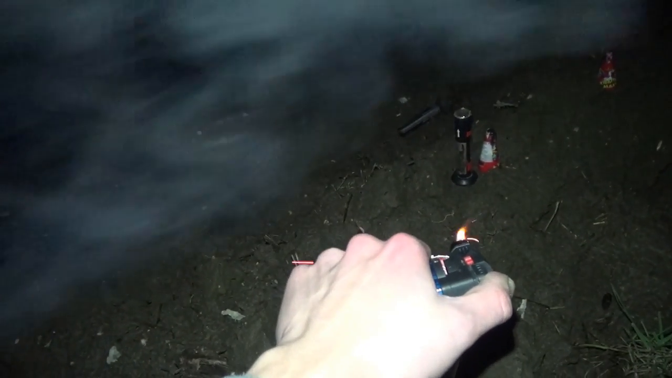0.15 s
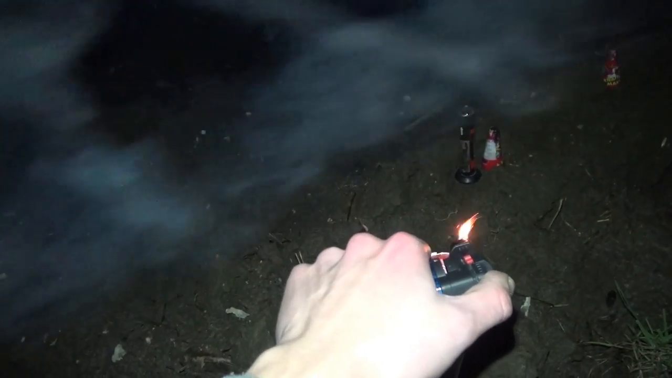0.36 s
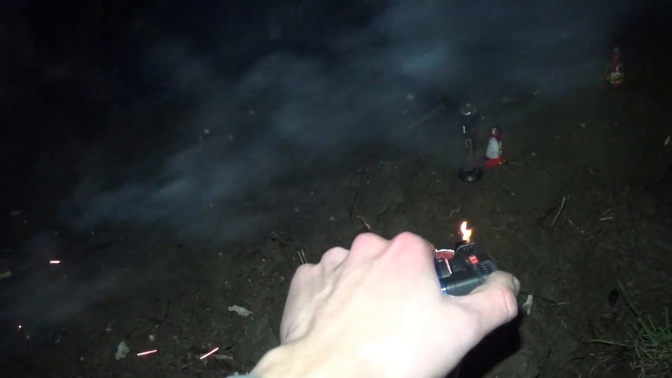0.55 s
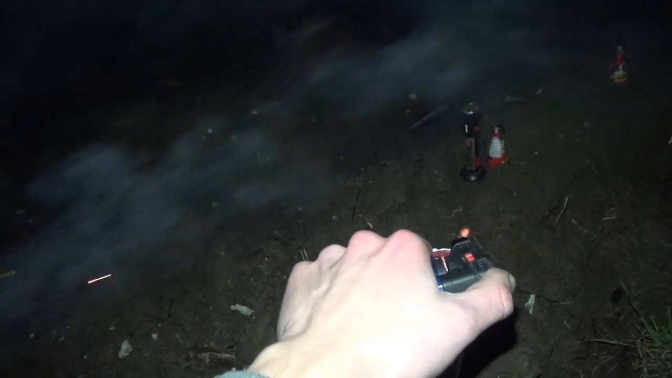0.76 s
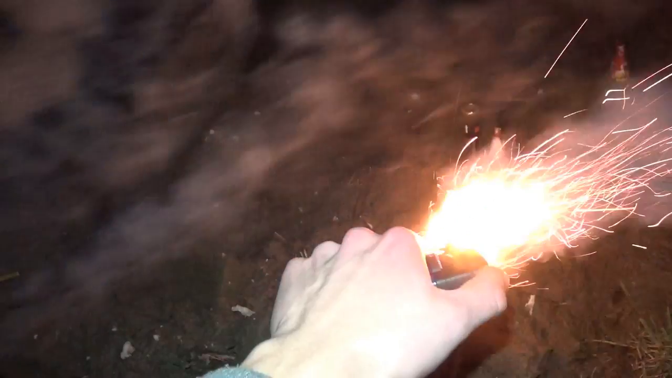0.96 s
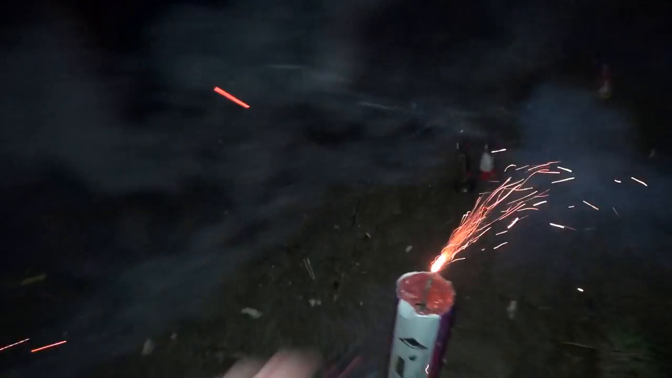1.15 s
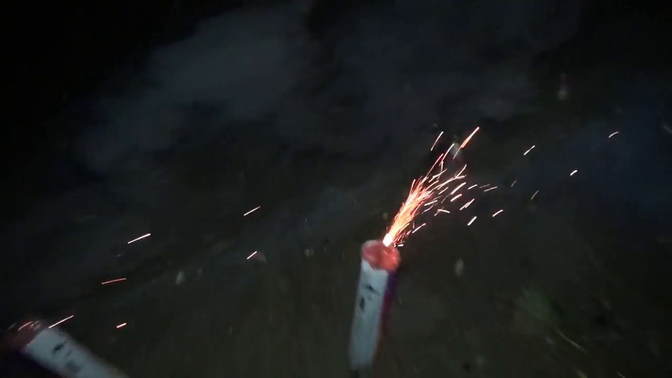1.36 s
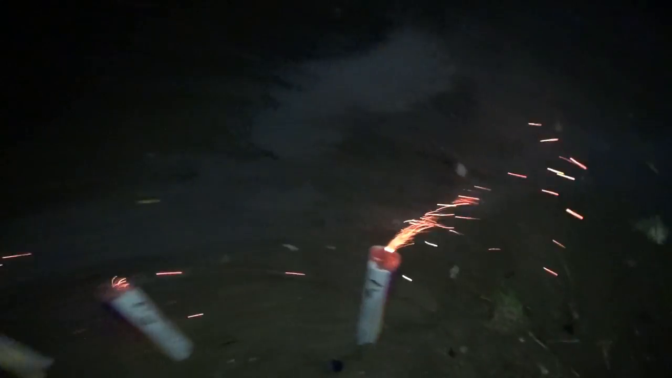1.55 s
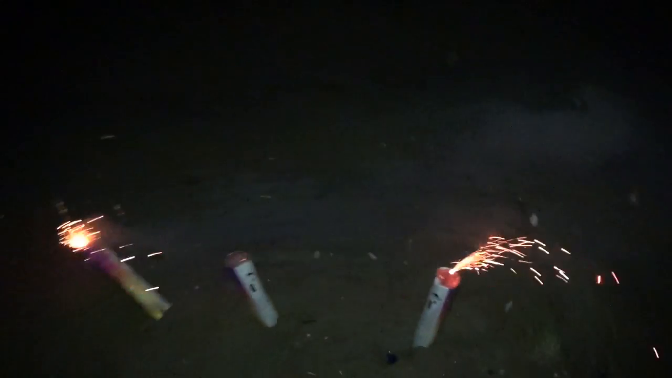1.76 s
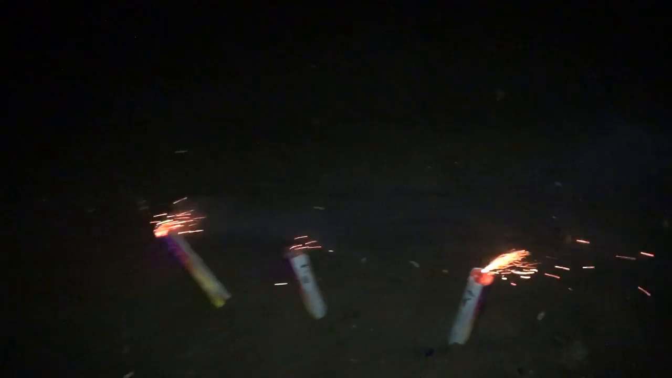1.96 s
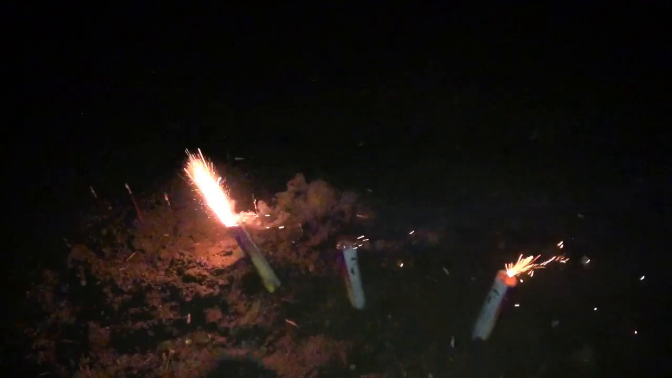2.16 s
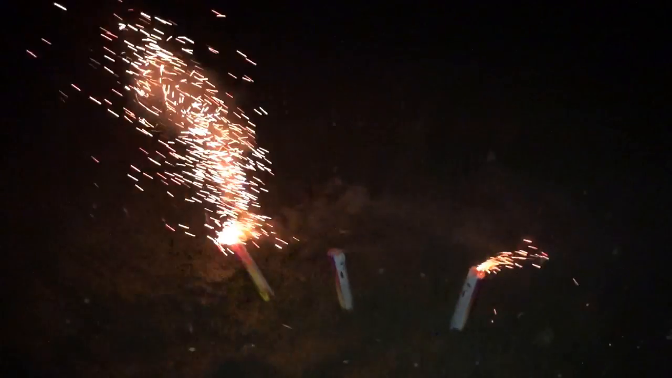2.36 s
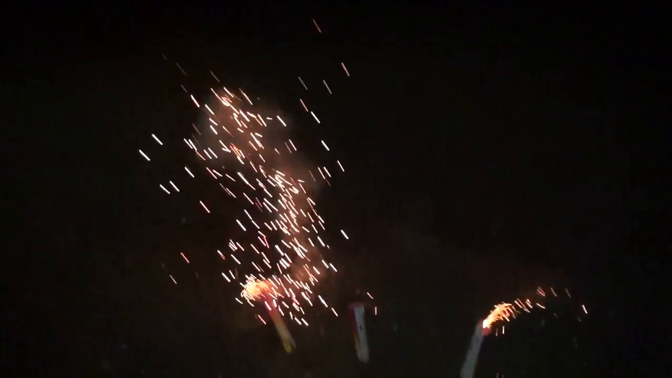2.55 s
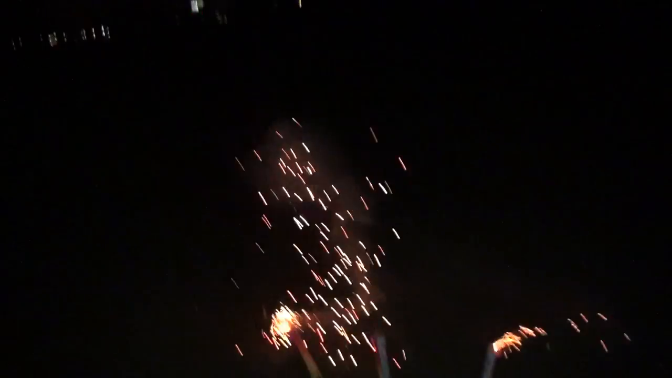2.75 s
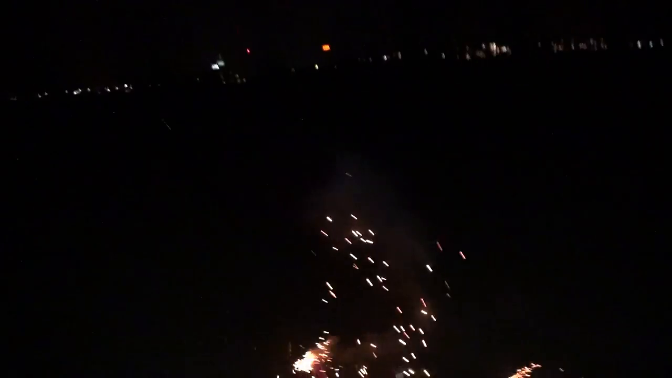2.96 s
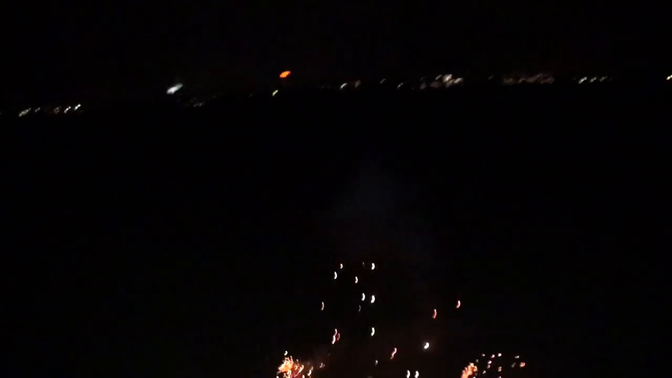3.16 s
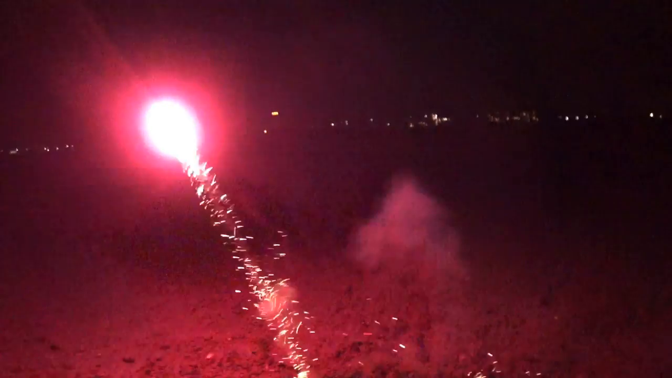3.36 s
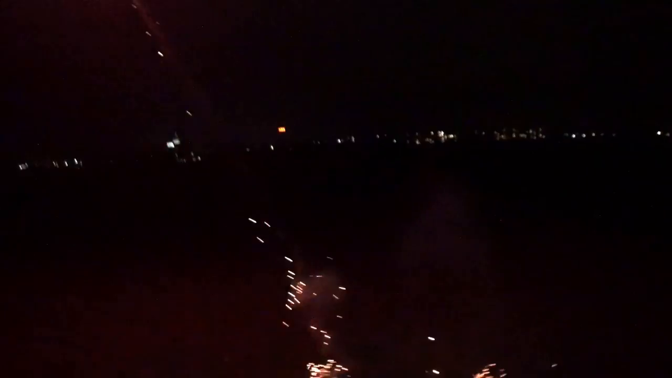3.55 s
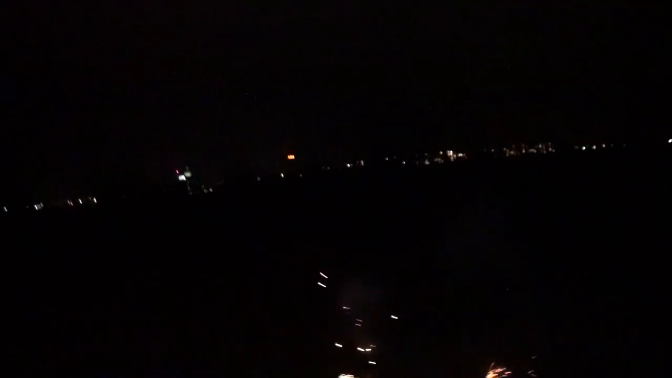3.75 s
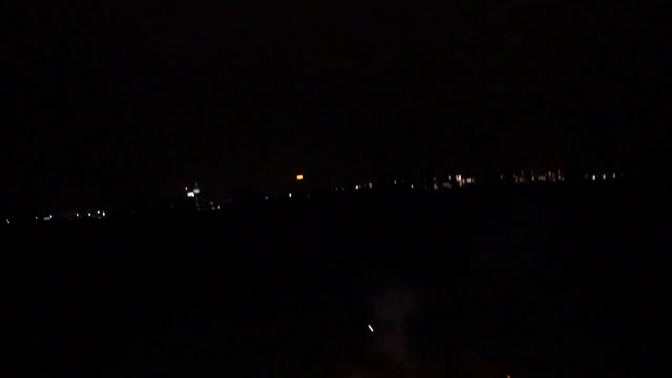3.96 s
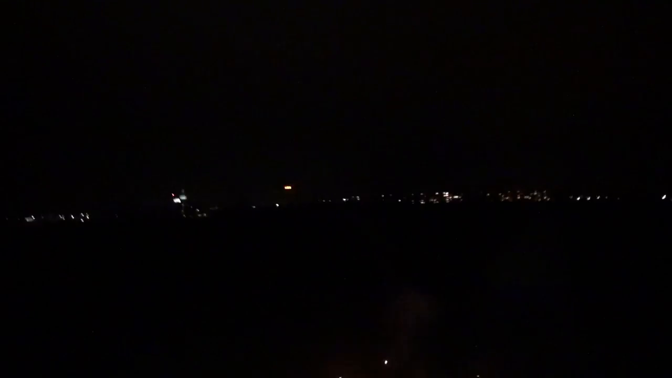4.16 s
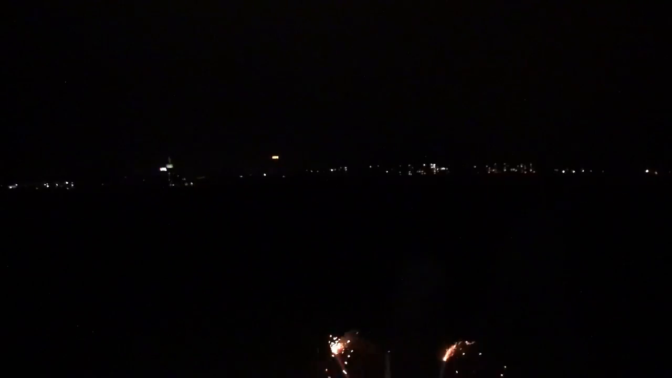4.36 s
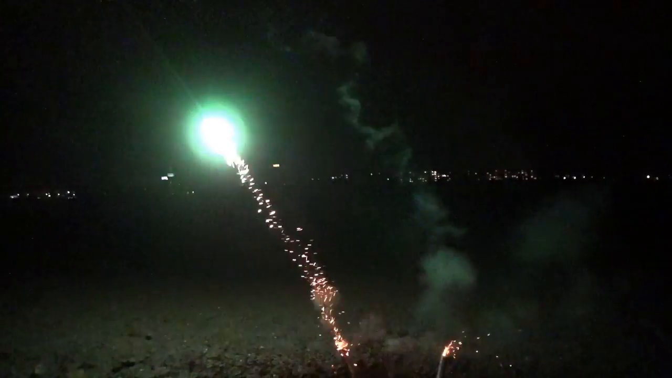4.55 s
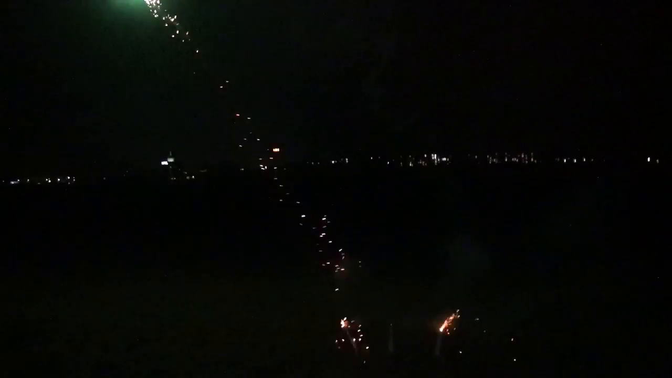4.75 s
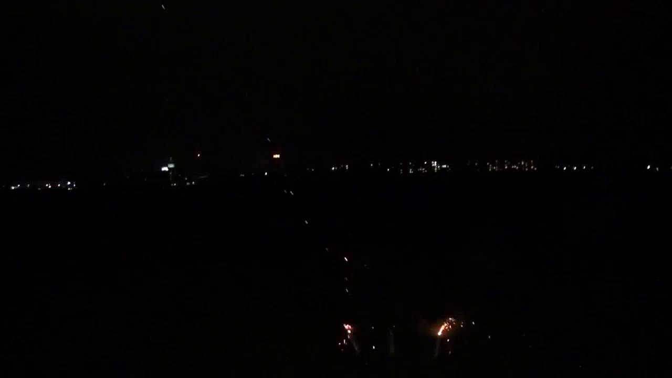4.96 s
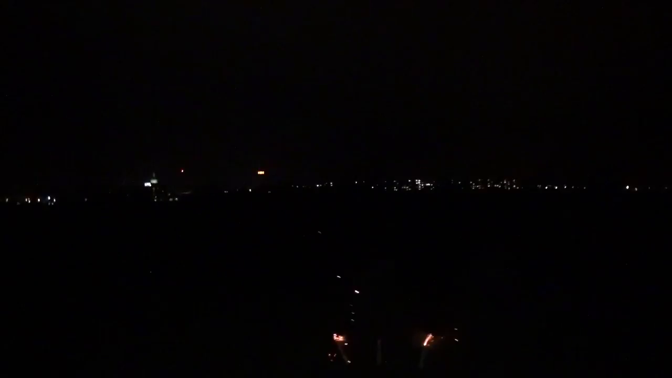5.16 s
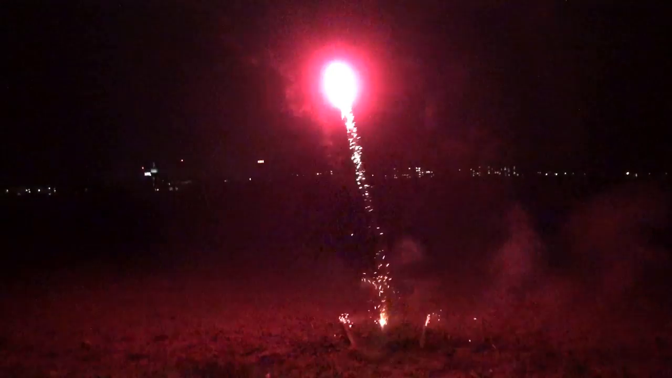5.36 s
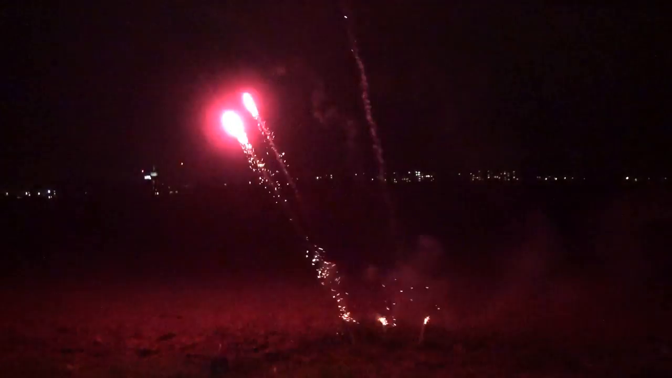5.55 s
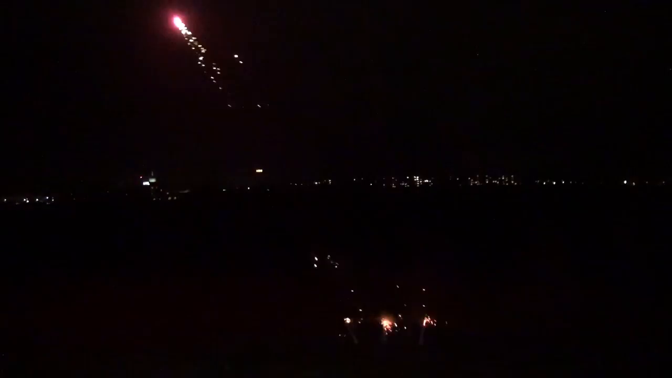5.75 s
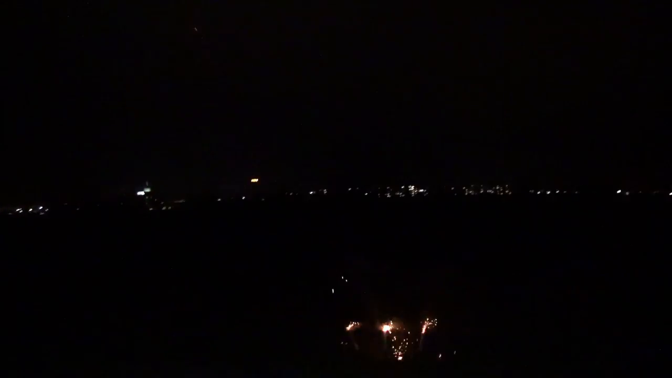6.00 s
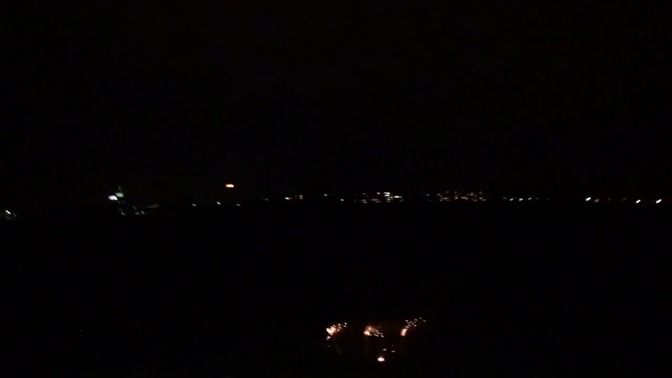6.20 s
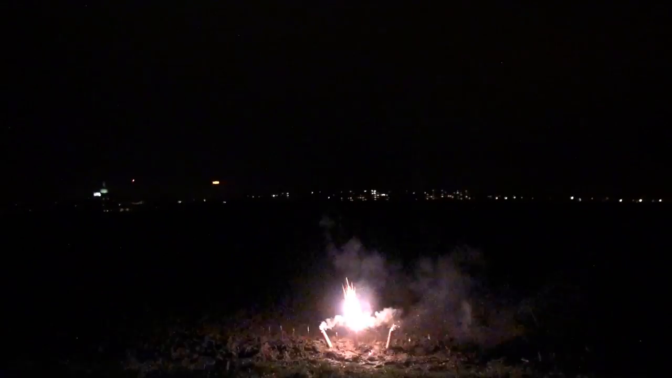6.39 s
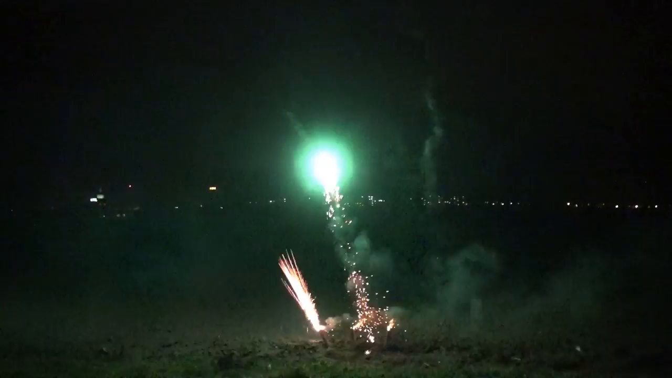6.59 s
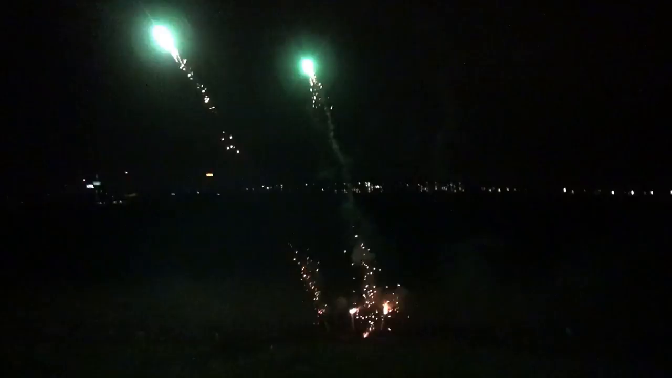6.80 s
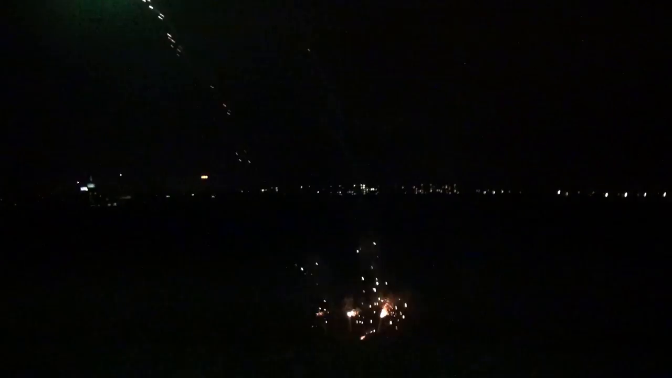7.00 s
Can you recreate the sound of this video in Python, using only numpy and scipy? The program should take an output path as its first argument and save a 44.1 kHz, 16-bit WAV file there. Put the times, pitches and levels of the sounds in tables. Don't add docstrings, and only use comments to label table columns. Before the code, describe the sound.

Close to a handheld stereo recorder, a fuse fizzes and spits, then a rough gush of burning gas flares for a moment. Steady sparkling hiss fades as the recorder backs away. Hollow tube pops follow, first spaced, later paired, with stars hissing off and dull snaps far up. Wind rumbles and the body gets knocked.

```python
import sys
import numpy as np
from scipy import signal
from scipy.fft import rfft, irfft
from scipy.io import wavfile
from scipy.ndimage import uniform_filter1d

SR = 44100
rng = np.random.default_rng(int(sys.argv[2]) if len(sys.argv) > 2 else 0)


def elevation(decibels):
    levels = np.asarray(decibels, float)
    return 10 ** (levels / 20)


def waveform_to_disk(signal):
    frames = np.transpose(np.atleast_2d(signal))
    scaled = np.clip(frames, -1, 1) * 32767
    samples = np.round(scaled).astype(np.int16)
    wavfile.write(sys.argv[1], SR, samples)


N = 310023


def evened(x):
    return x / np.sqrt(np.mean(x ** 2) + 1e-20)


def read(points, hz):
    f, value = np.transpose(points)
    return np.interp(np.log(hz + 1), np.log(f + 1), value)


def summed(levels_db):
    return 10 * np.log10((elevation(levels_db) ** 2).sum(axis=0))


def ragged_db(count, size, depth_db):
    return depth_db * evened(uniform_filter1d(rng.standard_normal(count), size=size))


def resonated(x, hz, q):
    return evened(signal.lfilter(*signal.iirpeak(hz, q, SR), x))


def add(mix, start_s, sound, pan_db):
    part = mix[:, round(start_s * SR):][:, :sound.shape[-1]]
    part += (sound * elevation([[pan_db / 2], [-pan_db / 2]]))[:, :part.shape[1]]


def colour(x, points):
    hz = abs(np.fft.fftfreq(2048, 1 / SR))
    log_gain = np.log(elevation(read(points, hz)))
    taps = np.fft.ifft(np.exp(np.conj(signal.hilbert(log_gain)))).real[:1024]
    return signal.fftconvolve(x, taps[None], axes=1)[:, :x.shape[1]]


# pitch_hz, likeness_0_to_1
PORT_LIKENESS = [(40, .995), (120, 0.96), (300, 0.93), (1400, 0.98), (3000, 1), (5000, 0.99), (8000, 0.84),
                 (10500, 0.78), (12000, .997)]
# pitch_hz, lead_rad
PORT_LEAD = [(0, 0), (5200, 0.0055), (8200, 0.27), (11000, 0.11), (16500, 0)]


def pair(count):
    a, b = rfft(rng.standard_normal((2, count)))
    hz = np.fft.rfftfreq(count, 1 / SR)
    same = np.clip(read(PORT_LIKENESS, hz), 0, 1)
    left = a * np.exp(1j * read(PORT_LEAD, hz))
    right = same * a + np.sqrt(1 - same ** 2) * b
    return irfft(np.array([left, right]), count)


def banded(noise, rows, bands, points, size, patchy_db, flicker_db):
    hz, t, z = signal.stft(noise, SR, nperseg=size, noverlap=size * 3 // 4)
    shape_db = read(points, hz)
    s, *columns = np.transpose(rows)
    columns = np.array([np.interp(t, s, c) for c in columns])
    levels, pans = columns[:len(bands)], columns[len(bands):]
    pans = pans[np.arange(len(bands)) * len(pans) // len(bands)]
    centre = [np.log(lo * hi) / 2 for lo, hi in bands]
    weight = np.array([np.interp(np.log(hz + 1), centre, one) for one in np.eye(len(bands))]).T
    inside = [(hz >= lo) & (hz < hi) for lo, hi in bands]
    own_db = [[10 * np.log10((elevation(shape_db[band]) ** 2).sum() / len(hz))] for band in inside]

    chance = rng.standard_normal((len(t), len(hz))).T
    patches = evened(uniform_filter1d(uniform_filter1d(chance, size=7, axis=0), size=8, axis=1))
    field_db = shape_db[:, None] + weight @ (levels - own_db)
    field_db = field_db + patchy_db * patches + ragged_db(len(t), 3, flicker_db)
    lean_db = weight @ pans / 2
    z = z * elevation(np.array([field_db + lean_db, field_db - lean_db]))
    return signal.istft(z, SR, nperseg=size, noverlap=size * 3 // 4)[1][:, :N]


# low_hz, high_hz
WIND_BANDS = [(25, 70), (80, 190), (210, 450), (500, 1100)]
# peak_s, length_s, level_db, strongest_hz
GUSTS = [(0.603, 3.1, -50, 90), (1.16, 0.4, -32.5, 520), (1.493, 0.43, -37, 75), (1.72, .25, -44, 300),
         (1.85, 0.21, -34, 480), (1.9, 0.37, -38, 58), (2.199, 0.13, -27, 138), (2.316, 0.15, -21.5, 73),
         (2.45, 0.15, -25.5, 120), (2.54, .25, -32, 60), (2.6, .22, -25, 150), (2.74, 0.24, -35, 170),
         (2.88, 0.45, -43, 150), (3.15, 0.59, -42, 238), (3.383, 0.21, -41, 740), (3.56, 0.44, -41, 105),
         (3.7, 0.27, -40, 58), (3.88, 0.36, -38.5, 125), (4.024, 0.18, -36.5, 387), (4.255, 0.13, -38, 450),
         (4.638, 0.4, -43.5, 120), (4.82, 0.16, -40, 195), (4.916, 0.31, -34, 230), (5.06, 0.21, -37, 422),
         (5.3, 0.41, -38.5, 430), (5.67, 0.42, -40.5, 194), (6.02, 0.37, -36.5, 397), (6.7, 0.27, -44, 420),
         (6.763, 0.28, -42.5, 65), (6.96, 0.39, -36, 190)]
# time_s, low_pan_db, high_pan_db
WIND_LEAN = [(0, 1, 2.5), (1.0, 3, 2.5), (1.3, 1.5, -4), (1.85, 2.5, 4), (2.2, -1, -3.5), (2.65, -0.5, -5),
             (3.9, 10.5, -5.5), (5.5, 13, -9), (6.3, 7, -7), (7.03, 5, -4)]


def gusting():
    ends_db, below_db_per_octave, above_db_per_octave = 11, 10.5, 10.5
    calm_db = (-80, -59, -52.5, -48.5)
    t = np.arange(0, N / SR + .01, .01)
    peak_s, length_s, level_db, hz = np.transpose(GUSTS)[:, :, None, None]
    octaves = np.log2(np.sqrt(np.prod(WIND_BANDS, axis=1))[:, None] / hz)
    slope_db = np.where(octaves < 0, -below_db_per_octave, above_db_per_octave) * octaves
    swell_db = ends_db * (2 * (t - peak_s) / length_s) ** 2
    gusts = summed(level_db - slope_db - swell_db + 0 * octaves)
    bands = summed([gusts, np.array(calm_db)[:, None] + 0 * t])
    lean_s, low, high = np.transpose(WIND_LEAN)
    return np.transpose([t, *bands, np.interp(t, lean_s, low), np.interp(t, lean_s, high)])


# pitch_hz, density_db_per_hz
WIND_COLOUR = [(12, -28), (30, -23.5), (70, -6), (110, 1), (170, 3), (300, -2.5), (420, -7), (780, -15),
               (1200, -17.5), (2500, -38.5)]


def wind():
    return banded(pair(N), gusting(), WIND_BANDS, WIND_COLOUR, size=1024, patchy_db=1.7, flicker_db=1.0)


# start_s, peak_db,
# pan_db, pitch_hz
KNOCKS = [(1.8056, -27, 2, 384), (1.8114, -26.5, 3, 404), (1.8455, -16, 1.5, 298), (2.3045, -14, -3, 153),
          (3.9923, -31, -6, 600), (4.0195, -31, -6, 560), (4.0498, -28, -7, 520), (4.268, -33, -6, 517),
          (5.3785, -13, -10, 600), (6.1204, -18, -8.5, 460), (6.736, -18.5, 2, 288),
          (6.738, -16.5, -8, 610), (6.6467, -17.5, -5.5, 510)]


def knock(mix, start_s, peak_db, pan_db, hz):
    turns = np.arange(round(SR * 5 / hz)) / SR * hz
    u = turns / 1.12
    push = u * np.exp(1 - u ** 1.9) * np.sin(2 * np.pi * turns ** 0.97)
    add(mix, start_s, elevation(peak_db) * push[None], pan_db)


# start_s, peak_db, pan_db, ring_hz, tick_db
SNAPS = [
    (1.472, -15, -1.5, 1300, -10),
    (2.5743, -14, 0, 1180, 1),
    (3.109, -18.5, 0, 1130, 0),
    (3.1792, -25, -3, 1390, -14),
    (5.0409, -17, -4, 1300, -1.5),
    (6.2497, -17, -5, 1110, -3),
]


def snap(mix, start_s, peak_db, pan_db, hz, tick_db):
    t = np.arange(round(0.0099 * SR)) / SR
    sagging_s = t + .0006 * (1 - np.exp(-t / .0009))
    ring = np.sin(2 * np.pi * hz * .85 * sagging_s) * elevation(-60 * t / .009)
    tick = elevation(tick_db - 60 * t / 0.0012) * resonated(pair(len(t)), 4800, 1.0)
    tail = elevation(-10.5 - 60 * t / 0.025) * resonated(pair(len(t)), 0.76 * hz, 1.5)
    snapped = signal.lfilter(*signal.butter(2, 600, "high", fs=SR), ring + tick + tail)
    add(mix, start_s, elevation(peak_db) * snapped, pan_db)


# time_s, level_db
TUBES = [(0.98, -61), (1.06, -26), (1.17, -31), (1.27, -32), (1.53, -30.5), (1.76, -34), (2.13, -36.5),
         (2.4, -39), (2.94, -44.5), (3.75, -45), (4.1, -50.5), (4.6, -47), (5.05, -52), (5.25, -70),
         (5.45, -46.5), (6.1, -59.5), (6.5, -53), (7.03, -49.5)]
# loudest_s, level_db, rise_s
STARS = [
    (2.56, -41, .12),
    (3.5, -37, 0.21),
    (4.72, -42, .14),
    (5.45, -40, 0.073),
    (5.6, -38, 0.093),
    (6.72, -44.5, 0.22),
]


def burners(t):
    fuse_db, sag_s, sag_db_per_s, out_s = -40.5, 0.62, 12, 1.2
    star_rise_db, star_fade_db_per_s = 15.5, 47
    first = fuse_db - sag_db_per_s * np.maximum(t - sag_s, 0) - 99 * (t > out_s)
    stars = []
    for peak_s, level_db, rise_s in STARS:
        rise = star_rise_db * ((peak_s - t) / rise_s) ** 2
        fade = star_fade_db_per_s * (t - peak_s)
        stars.append(level_db - np.where(t < peak_s, rise, fade))
    return np.array([first, np.interp(t, *np.transpose(TUBES)), summed(stars), 0 * t])


def burning():
    t = np.arange(0, N / SR + .01, .01)
    tones = np.array([  # roar_db, fizz_db, sizzle_db, pan_db
        (-3.5, 0, -8, 3.5),
        (-3.5, 0, -2, -1.5),
        (-10.5, 0, 0.5, 0),
        (-53.5, -51, -58, 0)])
    bands = burners(t)[:, None] + tones[:, :3, None]
    lean = np.average(tones[:, 3:] + 0 * t, axis=0, weights=elevation(bands[:, 1]) ** 2)
    return np.transpose([t, *summed(bands), lean])


# low_hz, high_hz
BURN_BANDS = [(1200, 2500), (3000, 9000), (10000, 15500)]
# pitch_hz, density_db_per_hz
BURN_COLOUR = [(300, -15), (700, -7), (1300, -2), (2200, -3.5), (4500, 0), (7500, -0.5), (11000, -8),
               (12500, -6), (14500, -10.5), (16000, -15)]


def burn():
    sparks_per_s, spark_decay_s = 250, 0.00074
    sparks = elevation(3.3 * np.minimum(rng.exponential(1, N), 5)) * (rng.random(N) < sparks_per_s / SR)
    grain = 1 + 0.25 * signal.lfilter([1], [1, -np.exp(-1 / (spark_decay_s * SR))], sparks)
    fizz = evened(pair(N) * grain)
    return elevation(-1.5) * banded(fizz, burning(), BURN_BANDS, BURN_COLOUR, size=512, patchy_db=1.7,
                              flicker_db=0.35)


# time_s, near_delay_ms, far_delay_ms
BOUNCE_MS = [(0, 1.42, 2.3), (.95, 1.42, 2.3), (1.45, 1.39, 2.3), (1.75, 1.37, 2.3), (2.0, 1.52, 2.4),
             (2.25, 1.45, 2.4), (2.5, 1.35, 1.85), (2.75, 1.26, 1.8), (3.1, 1.03, 1.5), (3.3, .93, 1.39),
             (3.9, .74, .97), (4.5, .58, .85), (7.03, .62, .8)]
# time_s, share
NEAR_BOUNCE = [(0, .3), (.95, .35), (1.1, .15), (1.45, .4), (2.3, .35), (3.3, .5), (3.9, .3), (7.03, .25)]
# time_s, share
FAR_BOUNCE = [(1.45, 0.02), (1.7, 0.18), (2.65, 0.2), (2.9, .1), (7.03, .06)]


def ground(x):
    turn_rad, half_turn_hz, grass_hz = 2.6, 1500, 10000
    hz, t, z = signal.stft(x, SR, nperseg=512, noverlap=384)
    hz = hz[:, None]
    s, *columns = np.transpose(BOUNCE_MS)
    near_ms, far_ms = (np.interp(t, s, c) for c in columns)
    near, far = (np.interp(t, *np.transpose(share)) for share in (NEAR_BOUNCE, FAR_BOUNCE))
    power = elevation(burners(t)[:3]) ** 2
    low = power[:2].sum(axis=0) / power.sum(axis=0)
    near, far = near * low, far * low
    dull = np.exp(1j * turn_rad * hz / (hz + half_turn_hz)) / np.sqrt(1 + (hz / grass_hz) ** 2)
    delay = -2j * np.pi * hz / 1000
    comb = 1 + dull * (near * np.exp(delay * near_ms) + far * np.exp(delay * far_ms))
    z = z * comb / np.sqrt(1 + near ** 2 + far ** 2)
    return signal.istft(z, SR, nperseg=512, noverlap=384)[1][:, :N]


def hum(mix):
    mouth_hz, mouth_db = 770, -10
    t = np.arange(SR) / SR
    add(mix, 0, elevation(burners(t)[0] + mouth_db) * resonated(pair(SR), mouth_hz, 4.5), 3)


# start_s, peak_db, pan_db, centre_hz, length_ms
SPITS = [(0.1644, -24, 4, 8510, 6.5), (0.2309, -23, 2.5, 7700, 6), (0.274, -16, -1, 7510, 4.9),
         (0.3275, -21, 6, 6550, 6.5), (0.4394, -19, 1.5, 6540, 6.5), (0.492, -17, 1.0, 7060, 7.6),
         (0.5444, -28, 2.5, 8130, 6.5), (0.701, -19, -2, 12000, 6.5), (0.707, -13.5, 1, 8900, 7.4),
         (0.8644, -26, 6, 7180, 5.5), (1.22, -3, 0, 7400, 4.8), (1.259, -12, 3, 7390, 6.5),
         (1.8552, -12, 0, 6610, 14), (2.354, -16, 0.0, 6570, 5.3), (3.546, -16.5, 0, 7130, 6.5),
         (3.7744, -21.5, 3, 6590, 4.8), (5.915, -25.5, 0.5, 7050, 6.5)]


def spit(mix, start_s, peak_db, pan_db, hz, length_ms, sharp=1.7):
    t = np.arange(round(.12 * SR)) / SR
    u = t / (max(length_ms, .5) / 1000)
    burst = resonated(pair(len(t)), min(hz, 15000), max(sharp, .7))
    shape = np.minimum(2.5 * u, 1) * np.exp(-u ** 2)
    add(mix, start_s, .25 * elevation(peak_db) * burst * shape, pan_db)


def crackle(mix, count=36):
    start_s, end_s, peak_db, centre_hz = 0, .97, -31, 9000
    for when, size, pitch, length in rng.random((count, 4)):
        hz = centre_hz * (.75 + .6 * pitch)
        spit(mix, start_s + when * (end_s - start_s), peak_db + 8 * size, 2.5, hz, 1.6 + 3 * length, 1.5)


# time_s, level_db
FLARE = [(0.99, -37), (1.008, -26.5), (1.03, -15), (1.048, -12.5), (1.086, -17.5), (1.115, -14.5),
         (1.13, -16), (1.165, -30.5), (1.2, -41)]
# pitch_hz, density_db_per_hz
FLARE_COLOUR = [(59, -58), (100, -15.5), (219, -7), (492, -11), (768, -1.5), (1030, -5.5), (1800, -4.5),
                (6840, -3.5), (16000, -16.5)]


def flare(mix):
    s, level_db = np.transpose(FLARE)
    t = np.arange(s[0], s[-1], 1 / SR)
    rough_db = ragged_db(len(t), 24, 2.6)
    lumps_db = ragged_db(len(t), 260, .8)
    gush = evened(colour(pair(len(t)) * elevation(rough_db + lumps_db), FLARE_COLOUR))
    add(mix, s[0], gush * elevation(np.interp(t, s, level_db)) * signal.windows.tukey(len(t), .08), -.3)


# pitch_hz, density_db_per_hz
SHOT_COLOUR = [(59, -29), (100, -7), (315, -1.5), (970, -2), (1310, -1), (2320, -3.5), (3540, -4),
               (9210, -9), (12900, -18), (16000, -20)]
# time_s, pan_db
SHOT_LEAN = [(2.3, -4.5), (3.4, -6), (5.4, -7.5), (6.8, -4)]


def shot(mix, hz, blast_s, level_db, t60_s, build_ms, blast_db):
    lead_s, ring_t60_s, crack_s = .012, .007, .0001
    t = np.arange(round(.16 * SR)) / SR - lead_s
    after = np.maximum(t, 0)
    swell = elevation(18 * t / (max(build_ms, .2) / 1000)) + elevation(-22) * (t > -.005)
    fade = elevation(-60 * np.maximum(after - .003, 0) / max(t60_s, .01))
    fade = fade + elevation(-11 - 60 * after / 0.13)

    jet = evened(colour(pair(len(t)) * elevation(ragged_db(len(t), 20, 2.2)), SHOT_COLOUR))
    jet = jet + elevation(-13.0) * resonated(jet, hz, 3.0)
    u = after / crack_s
    crack = (1 - u) * np.exp(-u) * (t >= 0)
    ring = -np.sin(2 * np.pi * hz * after) * elevation(-60 * after / ring_t60_s)
    blast = elevation(blast_db) * (ring - 0.7 * crack)

    pop = elevation(level_db) * (jet * np.where(t < 0, swell, fade) + blast)
    pop = signal.lfilter(*signal.butter(2, 250, "high", fs=SR), pop)
    low = signal.lfilter(*signal.butter(1, 1400, fs=SR), pop)
    add(mix, blast_s - lead_s, low, np.interp(blast_s, *np.transpose(SHOT_LEAN)))
    add(mix, blast_s - lead_s, pop - low, -.3)


# blast_s, level_db, t60_s, build_ms, blast_db
WIDE_SHOTS = [
    (3.3845, -12.5, 0.046, 6.6, -6),
    (4.5637, -15, 0.044, 5.4, 8),
    (5.3783, -14.5, 0.025, 0.46, 5),
    (6.5439, -19.5, .085, 8.9, 7),
]
# blast_s, level_db, t60_s, build_ms, blast_db
NARROW_SHOTS = [
    (5.5419, -16, 0.075, 2.7, 5.5),
    (6.7373, -15.5, 0.03, 4.9, -8),
]


def tube_shots(mix):
    shot(mix, 1090, 2.3032, -15.5, 0.054, 0.28, 12)
    for mouth_hz, rows in ((1400, WIDE_SHOTS), (2380, NARROW_SHOTS)):
        for row in rows:
            shot(mix, mouth_hz, *row)


def scene():
    mix = wind() + ground(burn())
    for source, rows in ((knock, KNOCKS), (snap, SNAPS), (spit, SPITS)):
        for row in rows:
            source(mix, *row)
    hum(mix)
    crackle(mix)
    flare(mix)
    tube_shots(mix)
    return mix


def band_limit(x):
    return signal.sosfilt(signal.butter(12, 16970, fs=SR, output="sos"), x)


def record(dry):
    limited = np.tanh(dry / 1.2) * 1.2
    edge = signal.firwin(255, 15950, window=("kaiser", 9), fs=SR)  # low-pass, Hz
    finished = signal.oaconvolve(limited, edge[None], "same")
    return band_limit(finished)


dry = scene()
out = record(dry)
waveform_to_disk(out)
```